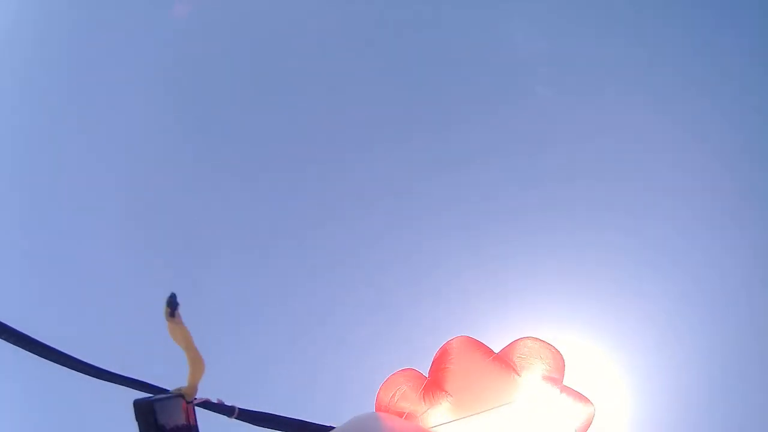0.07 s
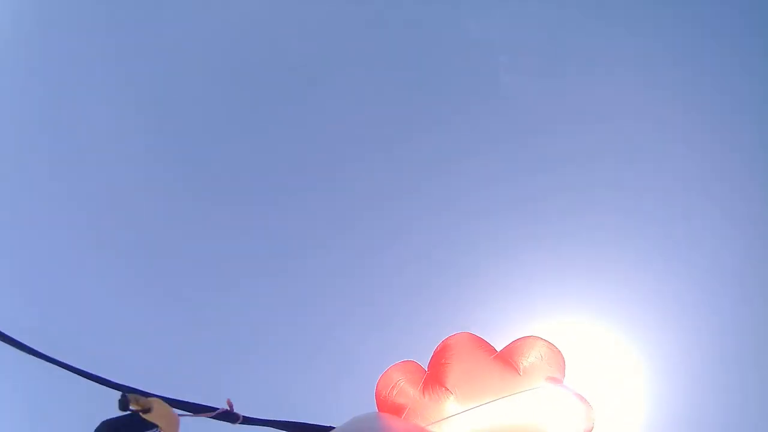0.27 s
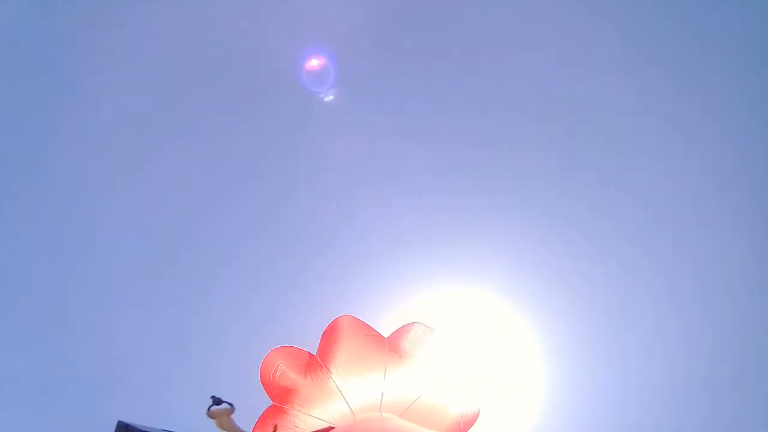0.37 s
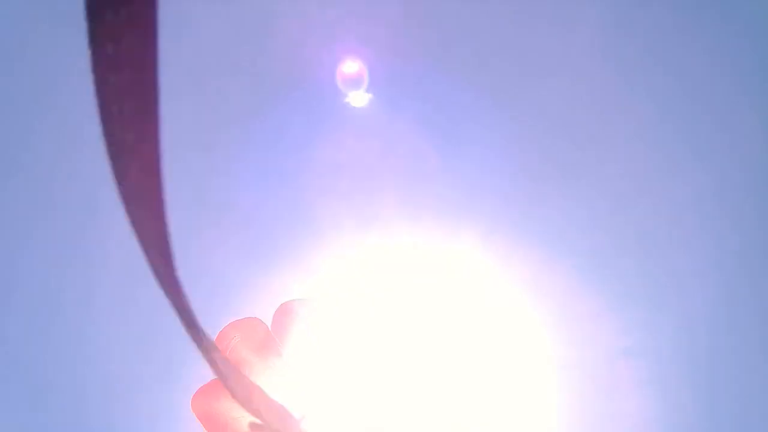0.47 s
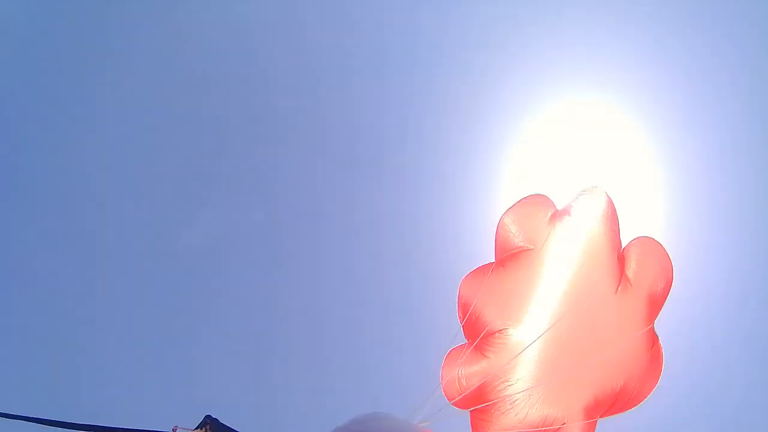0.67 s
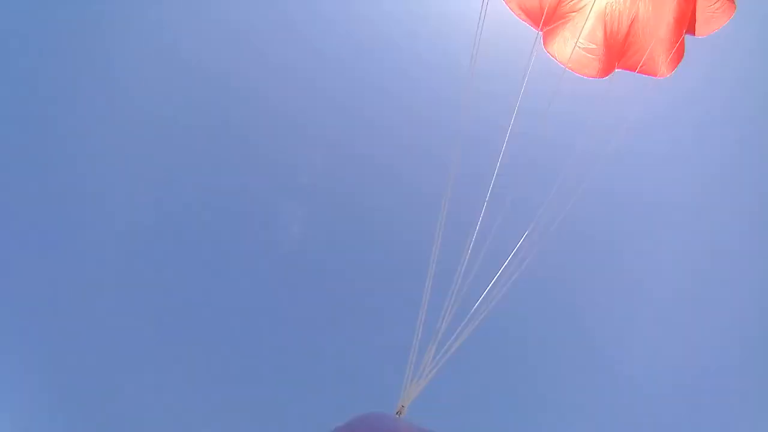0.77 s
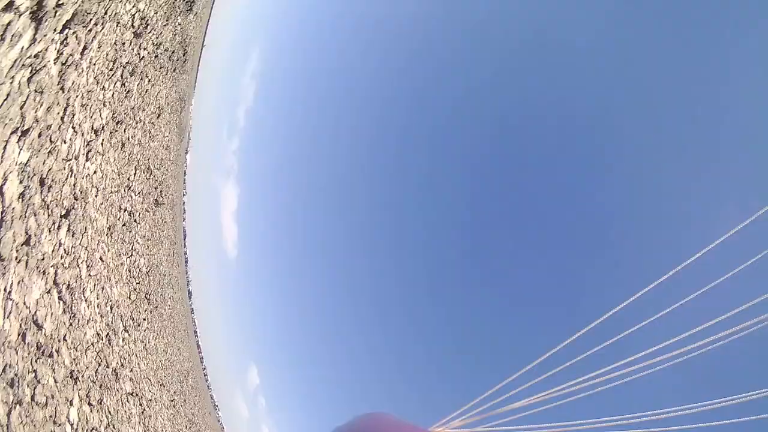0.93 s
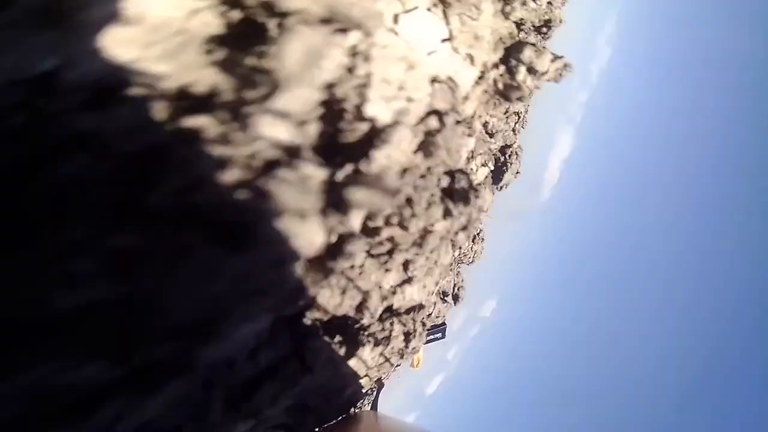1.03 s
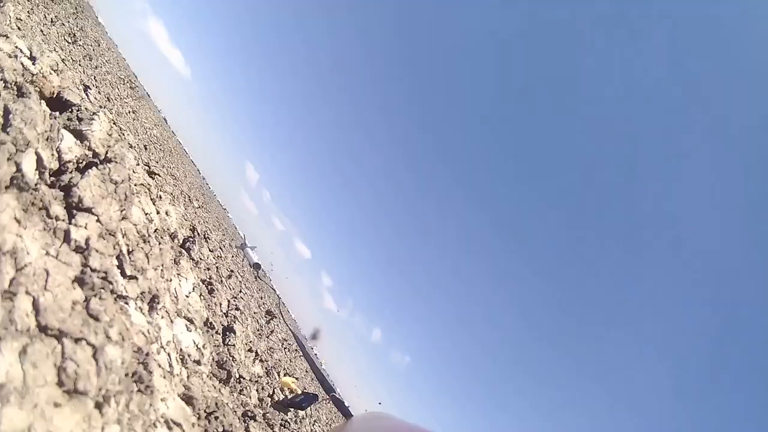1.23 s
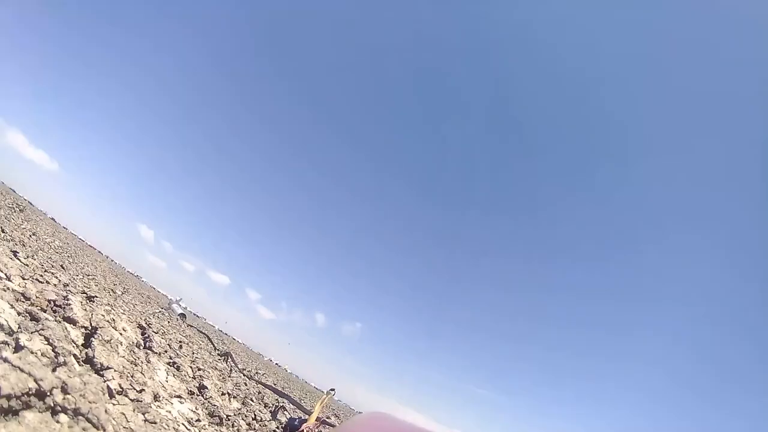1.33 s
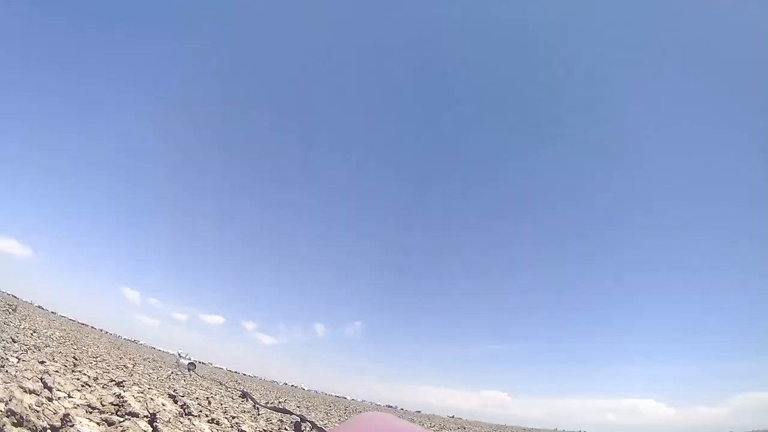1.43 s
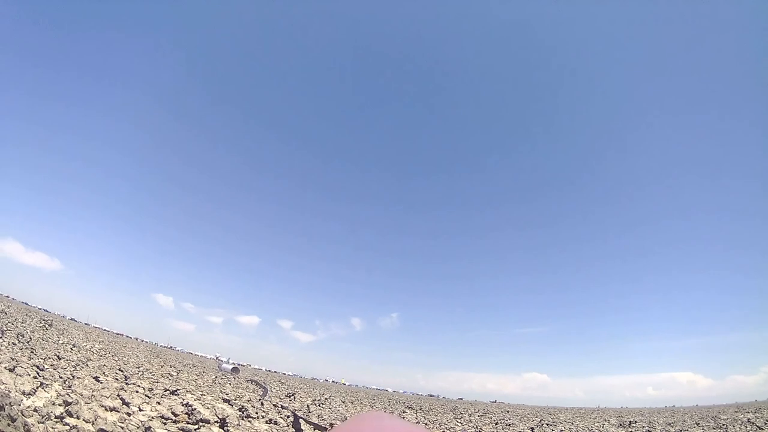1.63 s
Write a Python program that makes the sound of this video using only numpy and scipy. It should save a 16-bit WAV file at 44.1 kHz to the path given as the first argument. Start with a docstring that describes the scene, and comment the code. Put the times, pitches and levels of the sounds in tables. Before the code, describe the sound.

A small rocket crash-lands, heard from a microphone on its body. For the first 0.8 seconds, wind rumbles and hums in the tube while the harness gives irregular hollow knocks. At about 0.85 seconds it crashes onto dry ground, loudest and distorted near 0.9. From 1 to 1.4 seconds it scrapes over stones in gritty bursts with ticks and soft bumps, ending in a faint short slide around 1.5 seconds.

```python
"""A small rocket comes down under its parachute, heard by a camera on its body.
First, turbulent wind rumbles and excites a hum in the tube, while the harness knocks against it
and rings its modes. At 0.85 s the body crashes on dry ground and overloads the microphone.
Then friction takes over: it scrapes over stones amid ticking chips and soft bumps,
rolls, and slides a last short way."""
import sys
import numpy as np
from scipy import signal
from scipy.fft import rfft, irfft
from scipy.io import wavfile
from scipy.ndimage import uniform_filter1d

SR = 44100
rng = np.random.default_rng(int(sys.argv[2]) if len(sys.argv) > 2 else 0)


def pcm_store(signal):
    """Save signal as 16-bit PCM."""
    levels = np.round(np.clip(np.atleast_2d(signal), -1, 1) * 32767)
    wavfile.write(sys.argv[1], SR, levels.astype(np.int16).T)


N = 74970
T = np.arange(N) / SR

def amp(db):
    """Decibels to amplitude ratio."""
    return 10 ** (np.asarray(db) / 20)

def unit(x):
    """Normalisation to rms 1."""
    return x / np.sqrt(np.mean(x ** 2) + 1e-20)

def mix(events):
    """Superposition of (start in seconds, sound) pairs."""
    out = np.zeros(N)
    for start, sound in events:
        part = out[round(start * SR):][:len(sound)]
        part += sound[:len(part)]
    return out

def colour(x, points):
    """Spectral shaping through (Hz, dB) points; rms 1."""
    hz, db = np.transpose(points)
    f = np.fft.rfftfreq(len(x), 1 / SR)
    return unit(irfft(rfft(x) * amp(np.interp(np.log(f + 1), np.log(hz), db)), len(x)))

def resonate(x, hz, width_hz):
    """Two equal resonators in cascade; rms 1."""
    b, a = signal.iirpeak(min(hz, SR * .45), hz / (1.55 * width_hz), SR)
    return unit(signal.lfilter(b, a, signal.lfilter(b, a, x)))

def steady(x, size):
    """Division by the running rms evens out swells slower than size samples."""
    return x / np.sqrt(abs(uniform_filter1d(x ** 2, size)) + 1e-9)

# Spectrum of the wind. Each row: frequency in Hz, relative level in dB.
WIND_SPECTRUM = [(25, -21), (80, -9), (135, -19), (560, -17.5), (800, -28.5), (1050, -47), (2500, -53.5),
                 (6000, -66)]
# Course of the airflow. Each row: time in seconds, rush level in dB, hum level in dB.
AIRFLOW = [(0, -19.5, -54), (0.039, -29, -17.5), (0.112, -32, -30), (.21, -30, -24), (.52, -24.5, -29.5),
           (0.611, -32, -35), (0.821, -30, -36), (1.7, -39.5, -52)]
def wind():
    """Turbulence buffets the microphone and drives the air resonance of the open tube."""
    times, rush_db, hum_db = np.transpose(AIRFLOW)
    rush = steady(colour(rng.standard_normal(N), WIND_SPECTRUM), size=2500)
    hum = steady(resonate(rng.standard_normal(N), hz=207, width_hz=39), size=1500)
    return amp(np.interp(T, times, rush_db)) * rush + amp(np.interp(T, times, hum_db)) * hum

def coupling(hz, centre_hz, hardness=1):
    """Modal coupling peaks at a contact's centre frequency; softer contacts excite a narrower band."""
    spread_oct, floor = 0.38 * np.sqrt(hardness), 0.15 * hardness
    return floor + (1 - floor) * np.exp(-(np.log2(hz / centre_hz) / spread_oct) ** 2)

def contact_colour(x, tilt_db=0):
    """Each contact point has narrow resonances of its own, and a tilt per octave in the treble."""
    hz = np.arange(1, SR / 2, 190)
    db = 4.2 * rng.standard_normal(len(hz)) + tilt_db * np.log2(1 + hz / 1000)
    return colour(x, np.transpose([hz, db]))

# Modes of the body. Each row: frequency in Hz, level in dB, time to decay by 60 dB in seconds.
BODY_MODES = [(341, 2.5, 0.057), (462.7, 0.5, 0.082), (571.4, 2, 0.05), (630, -2.5, 0.04), (679, -4, 0.026),
              (799, 4.5, 0.05), (1215, -2, 0.05)]
def body_ring(t, centre_hz, hardness):
    """Free vibration is a sum of damped modes, at slightly different random pitches on each knock."""
    detune = np.exp(.012 * rng.standard_normal(len(BODY_MODES)))
    ring = np.zeros(len(t))
    for k, (hz, db, t60) in enumerate(BODY_MODES):
        mode = amp(db - 60 * t / t60) * np.sin(2 * np.pi * hz * detune[k] * t)
        ring += (-1) ** (k // 2) * coupling(hz, centre_hz, hardness) * mode
    return ring

# Deep modes of the tube, with the columns of BODY_MODES.
TUBE_MODES = [(96, -10.5, 0.024), (202.2, 4.5, 0.071), (304, -17, 0.14)]
# Spectrum of a contact's crack. Each row: frequency in Hz, relative level in dB.
CRACK_SPECTRUM = [(200, 9), (1000, 0), (3000, -5), (3600, -14.5), (4600, -9.5), (5600, -18), (10000, -12),
                  (16000, -25)]
def impact(ring_db, centre_hz, crack_db, crack_s, thud_db, ping_db):
    """Impulse excitation: the contact cracks, the body rings, the tube thuds, the camera case pings."""
    t = T[:SR // 3]
    rise = lambda seconds: 1 - np.exp(-t / seconds)
    hardness = min(1, amp(.45 * (crack_db + 24)))  # cracks below -24 dB mark soft contacts
    ring = body_ring(t, centre_hz, hardness) * rise(0.002 / hardness) ** 2
    thud = sum(amp(db - 60 * t / t60) * np.sin(2 * np.pi * hz * t) for hz, db, t60 in TUBE_MODES)
    crack_noise, ping_noise, tail_noise = rng.standard_normal((3, len(t)))
    lowpass = signal.butter(5, 4600, fs=SR, output="sos")
    dull_tail = signal.sosfilt(lowpass, contact_colour(colour(tail_noise, CRACK_SPECTRUM)))
    crack = colour(crack_noise, CRACK_SPECTRUM) * np.exp(-(t / crack_s) ** 2)
    crack += amp(-9) * dull_tail * np.exp(-t / .012)
    ping = steady(resonate(ping_noise, hz=3593, width_hz=158), size=200) * np.exp(-t / 0.0047)
    return (amp(ring_db) * ring + amp(thud_db) * thud * rise(0.0034)
            + (amp(crack_db) * crack + amp(ping_db) * ping) * rise(0.00041))

# Knocks of the harness. Each row: start in seconds, ring level in dB, ring centre in Hz,
# crack level in dB, crack length in seconds, thud level in dB, ping level in dB.
HARNESS_KNOCKS = [(0.034, -8.5, 648, -39.5, 0.019, -27, -36), (0.2398, -2, 480, -10, 0.0075, -28, -10),
                  (0.254, 10, 580, -9.5, 0.0085, -9, -5), (0.369, 7, 540, -11.5, 0.0069, -7.5, -14),
                  (0.4321, 0.5, 530, -12.5, 0.0026, -12, -23), (0.4629, 0.5, 615, -20, 0.003, -27, -23),
                  (0.6202, -3.5, 710, -22, 0.0014, -50, -22.5), (0.726, 6.5, 614, -47.5, 0.0057, -48, -54),
                  (0.777, -4.5, 697, -53, 0.006, -43, -54), (0.8195, 4, 743, -7, 0.0013, -8, -13.5)]
def harness_knocks():
    """Each impact of the harness sets the body in free vibration."""
    return mix((start, impact(*row)) for start, *row in HARNESS_KNOCKS)

# Ticks on the shell. Each row: start in seconds, level in dB, centre frequency in Hz.
SHELL_TICKS = [(0.035, -45.5, 4350), (0.9528, -8.5, 8360), (1.0587, -12, 8700), (1.102, -1, 2290),
               (1.1436, -22, 10500), (1.151, -20, 10200), (1.555, -27.5, 3160)]
def ticks():
    """Small fittings and stone chips strike the shell, exciting broad, heavily damped resonances."""
    t = T[:SR // 10]
    decay = np.exp(-t / 0.0046)
    return mix((start, amp(db) * decay * resonate(rng.standard_normal(len(t)), hz, width_hz=0.27 * hz))
               for start, db, hz in SHELL_TICKS)

# Blows on the ground, with the columns of HARNESS_KNOCKS.
GROUND_BLOWS = [(0.846, 19.3, 746, 3, 0.031, 6.5, -5), (0.875, 4.8, 666, -4.5, 0.062, 1, -6.5),
                (0.905, 22.5, 740, 24, 0.012, -21, 32), (0.919, 16.3, 444, -19, 0.0061, 14.5, -18),
                (0.981, 1.4, 660, -22, 0.002, -1.5, -26), (1.196, 3.8, 855, -27.5, 0.004, -14.5, -13.5),
                (1.378, 3.2, 360, -17, 0.012, -3, -15)]
def ground_blows():
    """Collisions with the ground excite the same modes, most strongly during the crash."""
    return mix((start, impact(*row)) for start, *row in GROUND_BLOWS)

def grains(per_s, size):
    """A Poisson train of clicks, mostly small, a few large; rms 1."""
    strengths = amp(3.1 * np.minimum(rng.exponential(1, size), 5))
    return unit(strengths * rng.choice([-1, 1], size) * (rng.random(size) < per_s / SR))

def clumps(size):
    """Amplitude modulation within milliseconds, as stones catch and let go."""
    flicker = resonate(rng.standard_normal(size), hz=112, width_hz=112)
    return unit(amp(1.2 * flicker))

def pressure(t, length):
    """Contact force envelope: longer drags swell and fade more slowly, and arch higher."""
    swell = np.minimum(t / (0.22 * length), 1)
    fade = np.exp(-np.maximum(t - length, 0) / (0.34 * length))
    arch_db = 34 * length * (np.sin(np.pi * np.minimum(t / length, 1)) - 2 / np.pi)
    return swell * fade * amp(arch_db)

# Spectrum of the grit. Each row: frequency in Hz, relative level in dB.
GRIT_SPECTRUM = [(1000, -2), (2000, 4), (3000, -3), (3600, 7.5), (4100, -6.5), (4700, -6), (5600, -23),
                 (6800, -8.5), (8700, -15), (9500, -10.5), (14500, -19.5), (16000, -51)]
def scrape(length, grit_db, tilt_db, ring_db, centre_hz, bump_db):
    """Stick-slip friction: grit crackles in clumps while irregular slips drive body and tube."""
    t = T[:SR // 4]
    n = len(t)
    sandy_grains = grains(per_s=4000, size=n) + 0.14 * rng.standard_normal(n)
    grit = contact_colour(colour(sandy_grains, GRIT_SPECTRUM), tilt_db)
    slips = grains(per_s=730, size=2 * n)  # the first half lets the modes reach steady state
    ring = sum(amp(db) * coupling(hz, centre_hz) * steady(resonate(slips, hz, 1.97 / t60), size=2500)
               for hz, db, t60 in BODY_MODES)[n:]
    bumps = sum(amp(db) * resonate(slips, hz, width_hz=88) for hz, db, _ in TUBE_MODES)[n:]
    layers = [(amp(grit_db) * clumps(n), grit), (amp(ring_db), ring), (amp(bump_db), bumps)]
    return pressure(t, length) * sum(gain * steady(x, size=800) for gain, x in layers)

# Drags of the shell. Each row: start in seconds, length in seconds, grit level in dB,
# grit tilt in dB per octave, ring level in dB, ring centre in Hz, bump level in dB.
GROUND_DRAGS = [(0.949, 0.035, -14, 2.5, -10, 484, -21.5), (1.004, 0.024, -15, 4.5, -8, 530, -28),
                (1.035, 0.024, -17, 4.5, -15, 464, -28), (1.053, 0.025, -14, 1, -10.5, 506, -23),
                (1.078, 0.045, -14.5, 5.5, -12, 480, -21), (1.133, 0.065, -31.5, 4, -13, 490, -46),
                (1.173, 0.031, -14.5, 1.5, -9, 600, -40), (1.214, 0.08, -17, -1.5, -17, 630, -49),
                (1.318, 0.078, -21, -4, -11, 625, -35), (1.393, 0.036, -39.5, -2.5, -14, 510, -27),
                (1.44, 0.079, -43.5, -5, -35.5, 477, -41), (1.502, 0.051, -35.5, -1, -22.5, 572, -33),
                (1.534, 0.11, -32.5, 0, -21, 594, -43)]
def slide():
    """Friction acts in surges as the body drags, rolls and slides to rest."""
    return mix((start, scrape(*row)) for start, *row in GROUND_DRAGS)

# Soft bumps. Each row: start in seconds, level in dB.
SOFT_THUMPS = [(1.017, -13), (1.091, -14)]
def thumps(peak_s=0.0093):
    """A slow contact force excites only the deepest mode of the tube."""
    t = T[:SR // 10]
    thump = t / peak_s * np.exp(1 - t / peak_s) * np.sin(2 * np.pi * TUBE_MODES[0][0] * t)
    return mix((start, amp(db) * thump) for start, db in SOFT_THUMPS)

def scene():
    """Sound pressures add at the one microphone, over its own steady hiss."""
    sources = wind() + harness_knocks() + ground_blows() + ticks() + thumps() + slide()
    hiss = amp(-60.5) * rng.standard_normal(N)
    return (sources + hiss)[None]

def record(dry):
    """Saturation: the overloaded microphone flattens the peaks; filters then limit the band."""
    ceiling, knee = .7, 10
    low_cut_hz, top_hz = 8, 16100
    fine = signal.resample_poly(dry, 4, 1, axis=1)  # oversampling reduces aliasing
    clipped = fine / (3.5 + abs(fine / ceiling) ** knee) ** (1 / knee)
    x = signal.resample_poly(clipped, 1, 4, axis=1)
    x = signal.lfilter(*signal.butter(1, low_cut_hz, "high", fs=SR), x)
    lowpass = signal.firwin(301, top_hz, window=("kaiser", 8), fs=SR)
    return signal.oaconvolve(x, lowpass[None], "same")

dry = scene()
out = record(dry)
pcm_store(out)
```